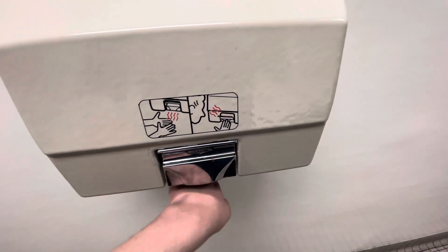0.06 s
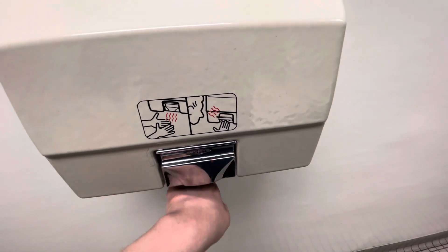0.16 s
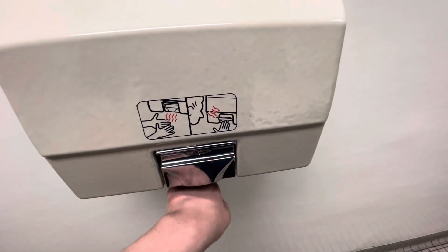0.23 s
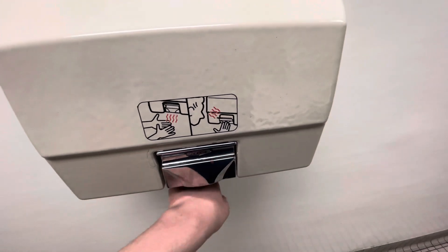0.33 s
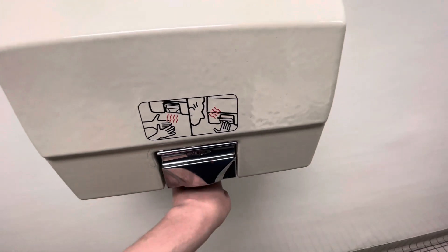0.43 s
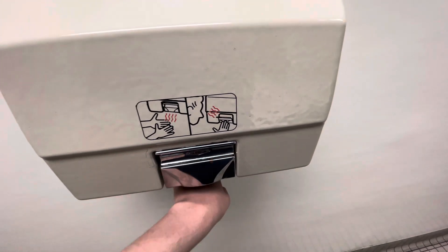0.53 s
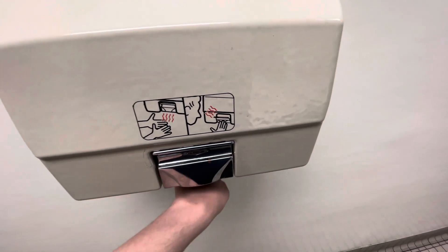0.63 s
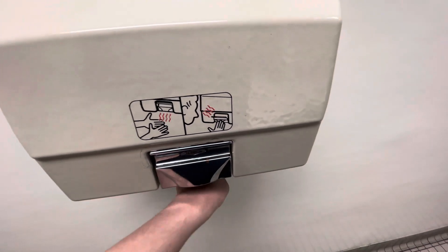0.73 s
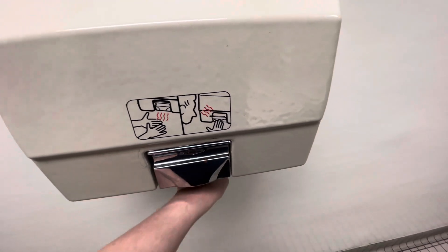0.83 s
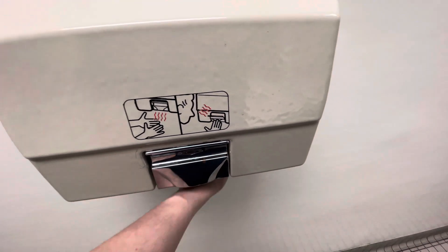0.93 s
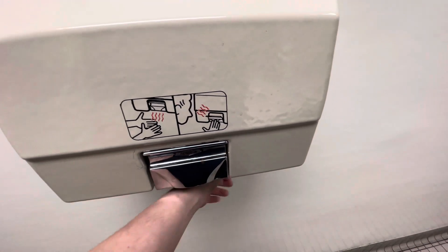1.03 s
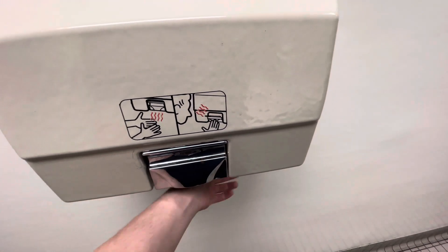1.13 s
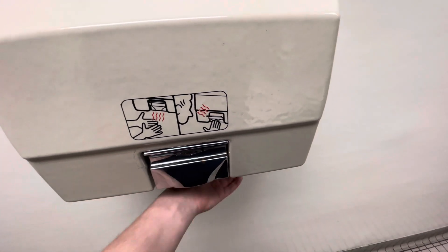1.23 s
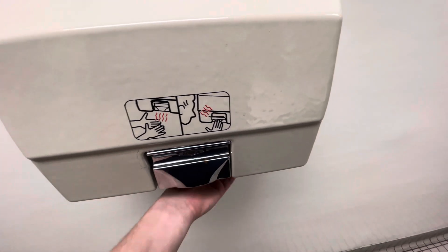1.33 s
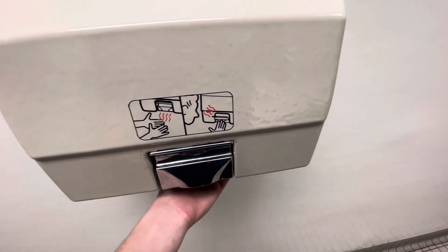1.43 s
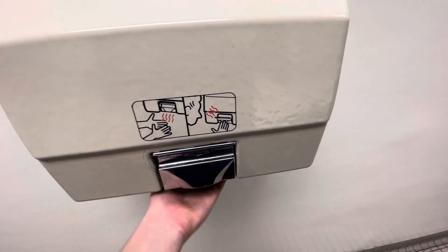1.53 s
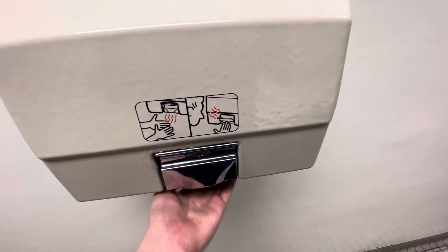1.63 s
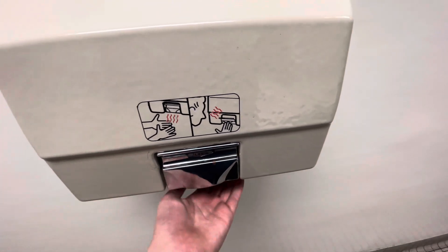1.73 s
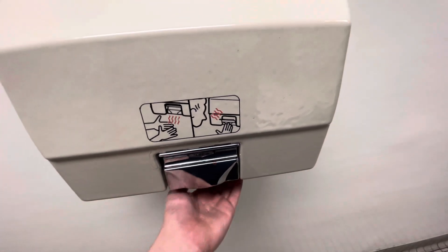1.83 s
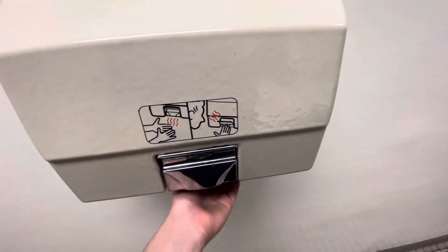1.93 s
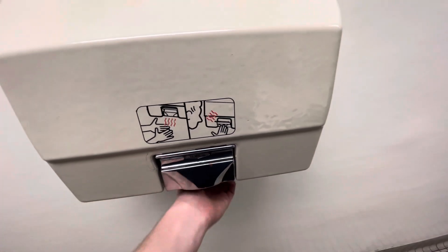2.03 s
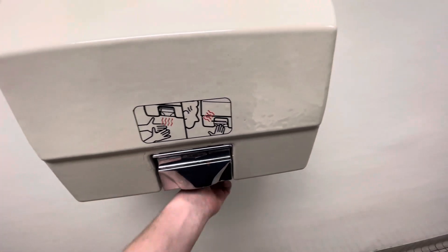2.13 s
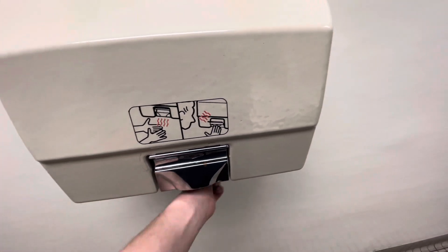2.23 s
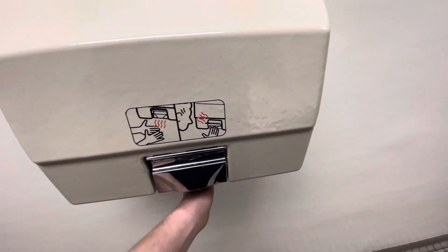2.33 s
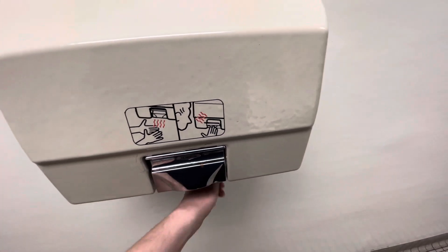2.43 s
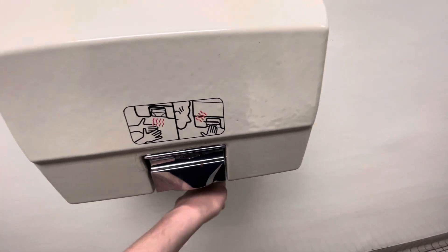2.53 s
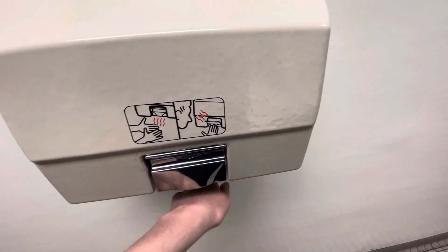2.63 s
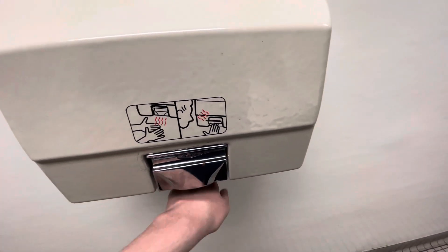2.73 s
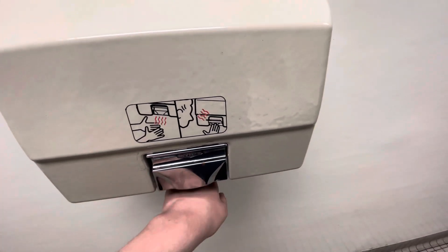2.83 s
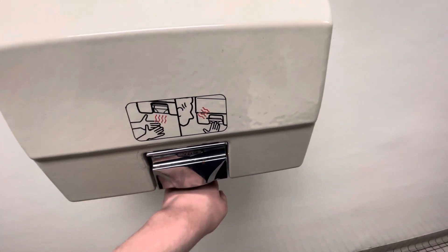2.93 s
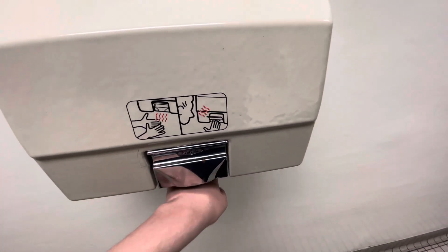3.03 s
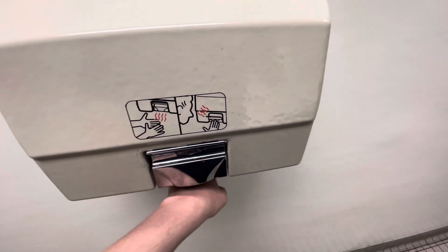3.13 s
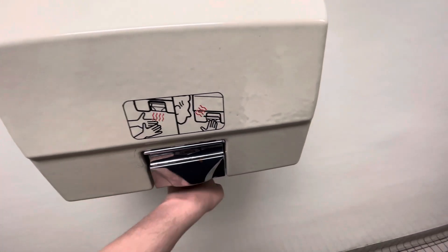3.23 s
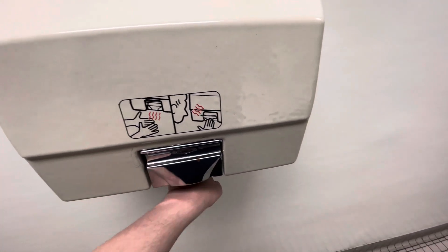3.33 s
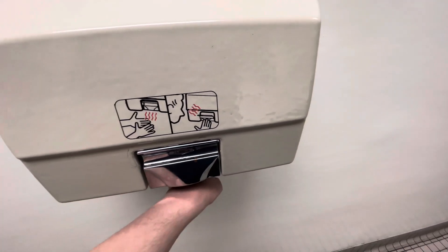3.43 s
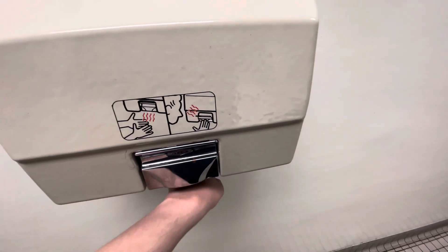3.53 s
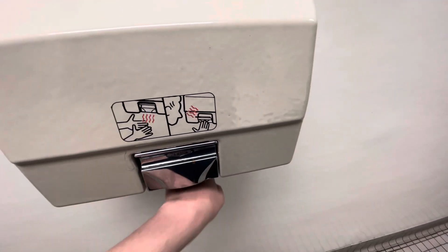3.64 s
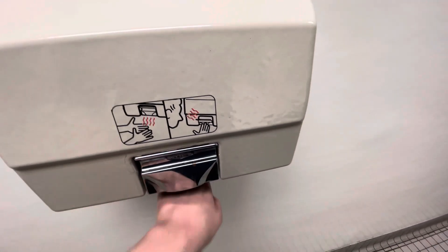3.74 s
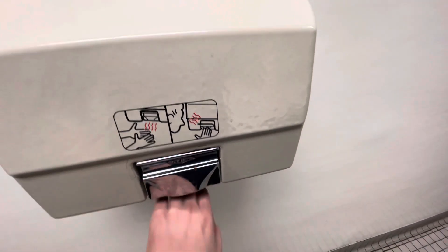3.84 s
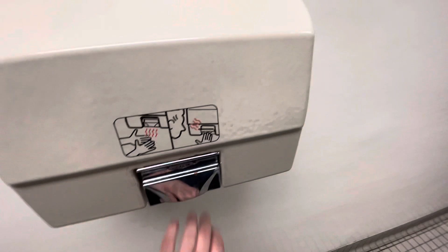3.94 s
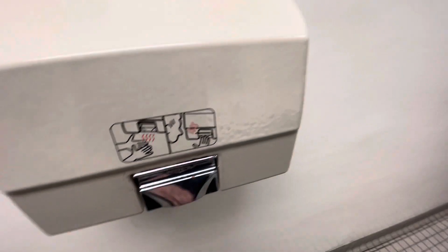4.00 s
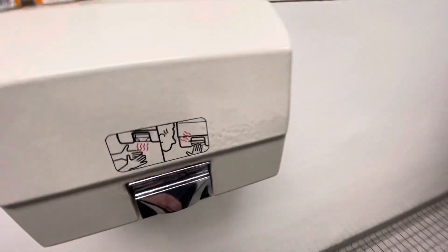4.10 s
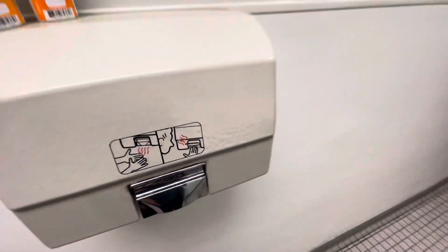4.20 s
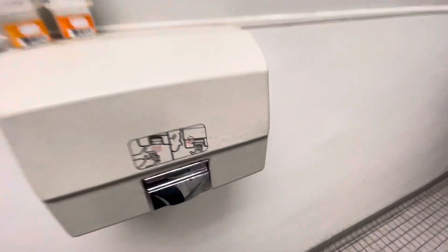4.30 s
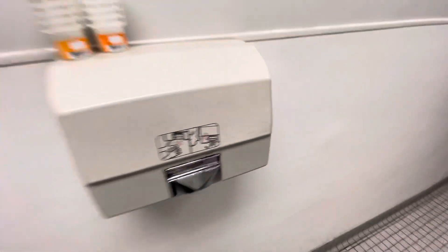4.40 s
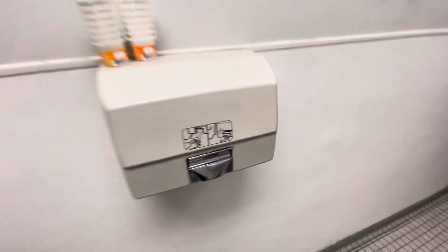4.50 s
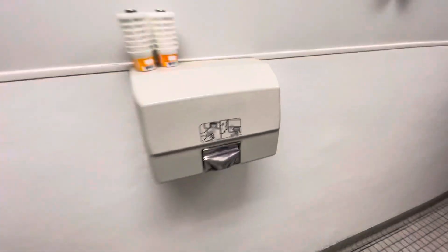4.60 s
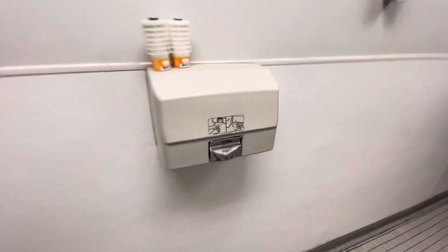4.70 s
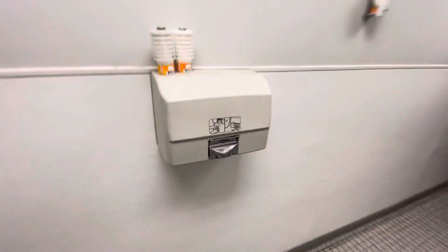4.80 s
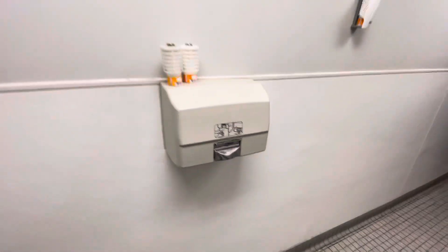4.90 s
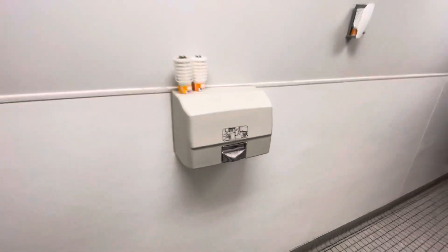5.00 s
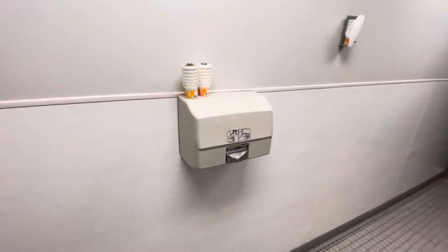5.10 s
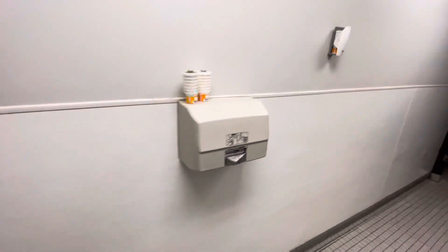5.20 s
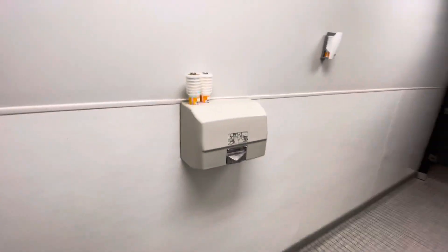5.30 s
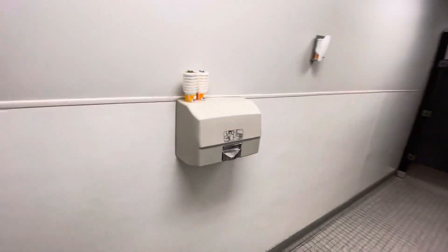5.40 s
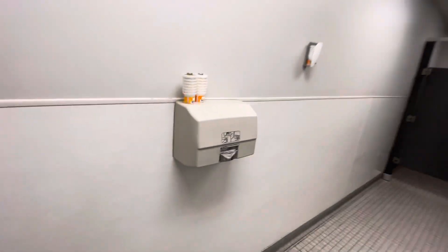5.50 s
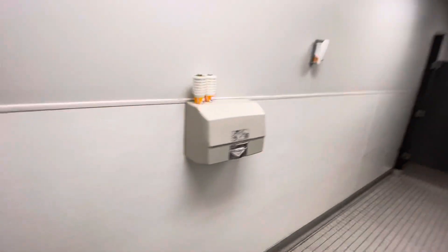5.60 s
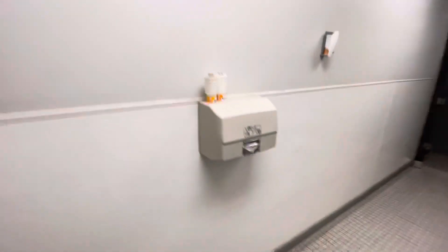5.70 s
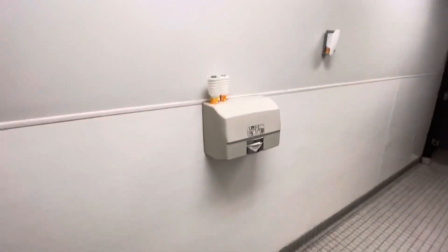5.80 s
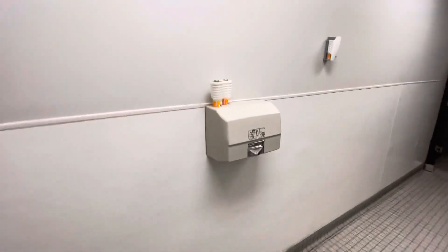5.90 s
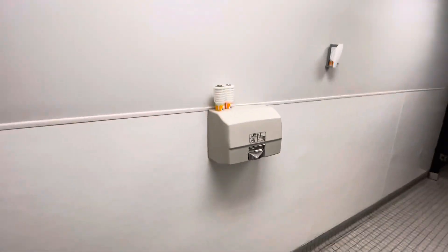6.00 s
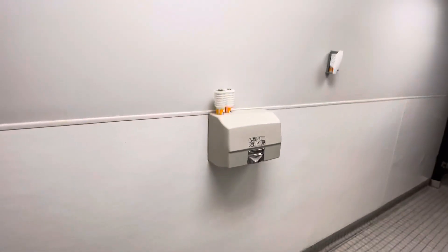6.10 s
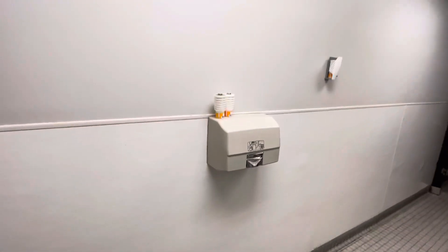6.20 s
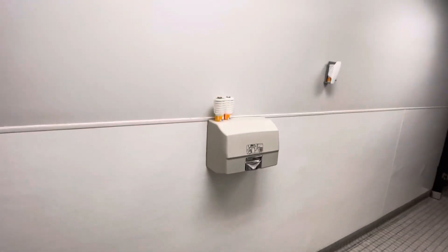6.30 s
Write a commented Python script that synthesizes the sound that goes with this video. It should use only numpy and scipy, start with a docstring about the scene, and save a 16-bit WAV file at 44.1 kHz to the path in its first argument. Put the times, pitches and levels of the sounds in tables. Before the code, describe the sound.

An electric hand dryer runs close to a phone microphone in a tiled restroom: strong low hum, broad fan roar, hissing air fluttering against a moving hand. The hand withdraws, the phone backs off and the sound turns more diffuse and roomy. Finally the motor clicks off with a soft low thump, and the fan winds down over a faint ventilation drone.

```python
"""A wall-mounted warm-air hand dryer in a tiled restroom, over a low ventilation drone, heard by a phone.
First the motor hums, the fan roars through the housing, and the jet hisses and buffets a hand.
Then the hand leaves and the phone backs away, so that room-coloured noise replaces the direct sound.
At last the timer cuts the motor: the hum dies and the coasting fan sinks in level and blade pitch.
Air sounds are filtered noise at two microphone ports; hum and whine are wavering sines."""
import sys
import numpy as np
from scipy import signal
from scipy.fft import rfft, irfft
from scipy.io import wavfile

SR = 44100
rng = np.random.default_rng(int(sys.argv[2]) if len(sys.argv) > 2 else 0)


def to_wav(s):
    """Save 16-bit WAV."""
    ch = np.atleast_2d(s).T  # columns
    pcm = np.round(np.clip(ch, -1, 1) * 32767)  # PCM
    wavfile.write(sys.argv[1], SR, pcm.astype(np.int16))


N = 280024
TIME = np.arange(N) / SR
FREQ = np.maximum(np.fft.rfftfreq(N, 1 / SR), 1)

SHAFT_HZ = 55.1  # turns per second at full speed, before the air load tugs at it
TIMER_S, COAST_HALF_S = 5.594, 1.18  # the timer cuts the power; time from there to half speed
HUM_HANG_S = 0.11  # the hum holds on this long after the timer

# How alike the two microphone ports hear the air close to the nozzle.
# Each row: frequency in Hz, likeness 0-1, phase lead of the left in rad, left minus right in dB.
PORTS_NEAR = [(152, 0.94, 0.34, -1.7), (333, 0.73, .15, 0.5), (503, 0.27, 0.97, 2), (645, 0, -2, 2),
              (810, 0.27, 1, 2), (1010, 0.37, 1.16, 3), (1130, 0.79, 1.1, 1.8), (1400, 0.7, 1.25, 0.5),
              (1620, .5, 1.64, -5), (1800, 0.51, 3, -4.5), (2150, 0.82, 2.5, -6), (2410, .15, 3.5, -5),
              (2770, 0.64, 3, 0), (3030, .89, 3.5, -.5), (3390, .75, 4, 1), (3700, .3, 4.5, .3),
              (4060, 0.6, 0.5, 0), (4770, 0.16, -0.3, 3), (5430, 0.17, 3, 3), (6020, 0.45, 0, 4.5),
              (6550, 0.53, .5, 2), (7230, .55, -1, 1), (8200, .35, 3.5, -3.5), (8740, .08, 1, -7),
              (9340, .45, 4.5, -3), (9800, 0.95, 3.5, -.8), (10450, 1, 3.5, -0.5), (10800, .82, 3.5, 1),
              (11190, 0.7, 1, 0), (11800, .95, 0, 0)]
# The same out in the room.
# Each row: frequency in Hz, likeness 0-1, phase lead of the left in rad, left minus right in dB.
PORTS_FAR = [(207, 0.96, 0.16, 0), (450, 0.15, 1.6, 1), (800, 0.15, 0.5, 0.5), (1310, 0.21, -0.2, 4),
             (2000, 0.1, 1.5, 2.5), (2800, 0.39, -1, 4), (4200, 0.22, 3, 0.5), (6500, 0.19, 1, 7),
             (8660, 0.24, -5, 0), (9800, 1, -3.5, -3), (11700, 0.86, 4.5, 0)]
# Swells and dips of the low eddies and of the rumble while the jet blows on the hand.
# Each row: centre in s, half-length in s, lift of the eddies in dB, lift of the rumble in dB.
JET_SWELLS = [(0.024, 0.12, 1, 0), (0.82, 0.26, 6, 2.1), (1.3, 0.11, 6, -1), (1.77, 0.11, 2, -3),
              (2.18, .2, 2, -1.5), (2.46, 0.12, 7, -1.5), (2.93, 0.43, 0.5, 1.5), (3.252, 0.11, 5, 0),
              (3.6, 0.16, 5, 2), (3.87, 0.033, -8, -6)]
# The cupped palm catches the jet.
# Each row: centre in s, half-length in s, level of the palm ring in dB, lift of the hiss in dB.
CUPS = [(1.72, 0.2, -24, 2), (3.793, 0.09, -34, 1.5)]


def undb(db):
    """Decibels to gain."""
    return 10 ** (np.asarray(db) / 20)


def curve(rows):
    """The columns of a table, joined by straight lines in time."""
    s, *columns = np.transpose(rows)
    return [np.interp(TIME, s, c) for c in columns]


def over_freq(hz, values):
    """Points joined on a log-frequency axis."""
    return np.interp(np.log(FREQ), np.log(hz), values)


def unit(x):
    """Scale a stereo sound so that its middle has rms 1."""
    return x / np.std(x.mean(axis=0))


def pan(db):
    """Left and right gains for a level difference."""
    return undb(np.array([db, -db]).reshape(2, -1) / 2)


def ramp(at_s, over_s):
    """A smooth step from 0 to 1, centred on at_s."""
    return (1 + np.tanh(2 * (TIME - at_s) / over_s)) / 2


def bump(s, length):
    """A smooth rise to 1 and fall, down to 1/e one length away from its centre."""
    return np.exp(-((TIME - s) / length) ** 2)


def band(lo_hz, hi_hz, order=6):
    """Gain of a band with smooth, steep edges."""
    low_edge = 1 + (lo_hz / FREQ) ** (2 * order)
    high_edge = 1 + (FREQ / hi_hz) ** (2 * order)
    return (low_edge * high_edge) ** -.5


def bell(hz, width):
    """Peak shape of one resonance: 1 at its centre, one half at the edges of its width."""
    return 1 / (1 + (2 * (FREQ - hz) / width) ** 2)


def lift(modes):
    """Resonances and dips as a gain in dB over frequency."""
    return sum(db * bell(hz, width) for hz, width, db in modes)


def walk(rate):
    """Slow random wander with spread 1, from a tenth of the rate up to the rate in Hz."""
    steps_per_s = 500
    steps = np.arange(-2, N / SR + 1, 1 / steps_per_s)
    slow = signal.butter(2, [rate / 10, rate], "bandpass", fs=steps_per_s, output="sos")
    wander = signal.sosfilt(slow, rng.standard_normal(len(steps)))
    x = np.interp(TIME, steps, wander)
    return x / x.std()


def tone(phase, flutter_db, flutter_rad, rate, lead=0):
    """A stereo sine of rms about 1 whose strength and phase shake in the moving air; the left leads."""
    shaken = phase + flutter_rad * walk(rate)
    strength = np.sqrt(2) * undb(flutter_db * walk(rate))
    return strength * np.sin([shaken + lead, shaken])


def turbulence(gain, ports):
    """Spectra of coloured noise at the two ports: a shared part, phase-led on the left, and a diffuse part."""
    hz, likeness, lead, side_db = np.transpose(ports)
    likeness = over_freq(hz, np.clip(likeness, 0, .99))
    lead = np.angle(over_freq(hz, np.exp(1j * lead)))
    right, diffuse = rfft(rng.standard_normal((2, N)))
    left = likeness * np.exp(1j * lead) * right + np.sqrt(1 - likeness ** 2) * diffuse
    return gain * np.array([left, right]) * pan(over_freq(hz, side_db))


def ringing(modes, ports):
    """Air noise of rms 1 in a few broad resonances."""
    gain = np.sqrt(sum(undb(db) ** 2 * bell(hz, width) ** 2 for hz, width, db in modes))
    return unit(irfft(turbulence(gain, ports), N))


def passing_rings(rows):
    """Noise in narrow or broad bands that swell, glide and fade, one for each row."""
    steps_per_s = 8000
    steps = np.arange(-1, N / SR + 1, 1 / steps_per_s)
    out = np.zeros((2, N))
    for s, length, hz, glide, width, db in rows:
        # slow complex noise, shifted up to the gliding centre
        narrow = signal.butter(2, width / 2, fs=steps_per_s, output="sos")
        noise = signal.sosfilt(narrow, rng.standard_normal((2, len(steps), 2)) @ np.array([1, 1j]))
        heard = np.abs(TIME - s) < 3 * length
        t = TIME[heard]
        carrier = np.exp(2j * np.pi * (hz + glide * (t - s) / 2) * (t - s))
        slow_noise = np.array([np.interp(t, steps, side) for side in noise])
        ring = np.real(carrier * slow_noise) / noise.real.mean(axis=0).std()
        out[:, heard] += undb(db) * bump(s, length)[heard] * ring
    return out


def wall_echo(x, distance, strength):
    """A bounce off the tiles combs the sound; the comb slides as the phone moves."""
    late = TIME - 2 * distance / 343  # there and back at the speed of sound in m/s
    echo = np.array([np.interp(late, TIME, side) for side in x])
    return (x + strength * echo) / np.hypot(1, strength)


def coasting(lag_s=0):
    """Share of full fan speed: air drag brakes the wheel once the timer runs out."""
    return 1 / (1 + np.maximum(TIME - TIMER_S - lag_s, 0) / COAST_HALF_S)


def air_level(part, in_jet, near):
    """Level in dB of one part of the air stream, from the hand, the phone's place and the fan speed."""
    db, hand_db, far_db, open_db, power = part
    place_db = far_db * (1 - near) + open_db * ramp(5.07, 0.15)  # the sound opens up out in the room
    speed_db = power * 20 * np.log10(coasting(lag_s=0.036))  # air and room follow the wheel late
    return db + hand_db * in_jet + place_db + speed_db


def ventilation():
    """The room's ventilation: noise in one low resonance as a steady drone, with a thin, wavering hum."""
    # The drone: frequency in Hz, width in Hz, level in dB.
    vent_drone = (205, 42, -40)
    # Its hum. Each row: frequency in Hz, level in dB.
    vent_lines = [(250, -45.5), (445, -53.5)]
    hz, width, db = vent_drone
    hum = 0
    for line_hz, line_db in vent_lines:
        line = tone(2 * np.pi * line_hz * TIME, flutter_db=4.0, flutter_rad=1.2, rate=8.0)
        hum = hum + undb(line_db) * line
    return undb(db) * ringing([(hz, width, 0)], PORTS_FAR) + hum


def passing_bands():
    """Short bands of noise: room resonances, a low thump as the motor cuts out, a brief late whistle."""
    # Each row: centre in s, half-length in s, frequency in Hz, glide in Hz per s, width in Hz, level in dB.
    short_bands = [(4.917, 0.13, 191, 1, 41, -27.5), (5.102, .06, 2900, 0, 900, -40),
                   (3.9, .25, 2700, -150, 70, -47), (5.32, 0.16, 2335, 100, 87, -35),
                   (5.66, .14, 2360, -100, 90, -41), (5.08, .17, 1700, 115, 45, -38.5),
                   (5.47, .15, 1728, 100, 43, -33.5), (5.32, 0.09, 5300, 0, 2200, -43),
                   (5.5, 0.1, 1295, 2, 100, -32.5), (5.685, .03, 224, -1, 60, -28),
                   (6.29, 0.045, 2570, 0, 140, -49), (6.33, .03, 1000, 0, 33, -38)]
    return passing_rings(short_bands)


def cabinet_drone(rumble_db, near):
    """The lowest panel modes sing almost steadily under the rumble, close to the cabinet."""
    # Panel modes. Each row: frequency in Hz, level in dB relative to the rumble.
    panels = [(171.5, -5.5), (198, -10.5), (311.5, -13.5)]
    drone = 0
    for hz, db in panels:
        mode = tone(2 * np.pi * hz * TIME, flutter_db=1.1, flutter_rad=0.68, rate=4.7, lead=0.1)
        drone = drone + undb(db) * mode
    return drone * undb(rumble_db) * np.sqrt(near)


def swelling_tones():
    """Single wavering tones that swell and fade at fixed pitches."""
    # Each row: centre in s, frequency in Hz, half-length in s, level in dB.
    swells = [(0.423, 1427, .07, -33), (1.56, 1570, 0.054, -29), (1.634, 1122, 0.16, -28),
              (2.072, 1150, 0.097, -29.5), (3.13, 1120, 0.22, -34), (3.06, 1272, .08, -36),
              (0.92, 1322, 0.11, -31), (2.15, 311, .25, -35), (3.9, 337.2, 0.092, -32),
              (5.444, 447, .05, -35), (5.52, 251.7, 0.12, -28), (5.677, 287, 0.13, -34),
              (6.055, 1168, .06, -41)]
    out = 0
    for s, hz, length, db in swells:
        wavering = tone(2 * np.pi * hz * TIME, flutter_db=1.5, flutter_rad=.4, rate=25)
        out = out + undb(db) * bump(s, length) * wavering
    return out


def fan(angle, roar_db, near):
    """Blade tones, locked to the shaft, ride on the roar and sink in pitch as the wheel coasts."""
    # Blade tones. Each row: multiple of the shaft speed, level in dB relative to the roar.
    blade_tones = [(24, -16), (42, -26), (96, -43), (108, -30)]
    whine = 0
    for k, db in blade_tones:
        whine = whine + undb(db) * tone(k * angle, flutter_db=4.0, flutter_rad=0.7, rate=6.7, lead=0.87)
    return whine * undb(roar_db) * np.sqrt(near)


def duct(roar_db, near):
    """The sharpest duct resonances half whistle, each wavering in pitch and strength on its own."""
    # Duct resonances. Each row: frequency in Hz, level in dB relative to the roar.
    duct_modes = [(1092, -19.5), (1117, -18), (1147, -16), (1262, -21), (1393, -20), (1498, -22),
                  (1566, -22.5)]
    whistles = 0
    for hz, db in duct_modes:
        whistle = tone(2 * np.pi * hz * TIME, flutter_db=3.5, flutter_rad=1.48, rate=6.9, lead=1.0)
        whistles = whistles + undb(db) * whistle
    return whistles * undb(roar_db) * near


def motor(angle, near, distance):
    """The motor shakes the cabinet twice a turn; overtones waver more, the mains adds a faint beat."""
    # Motor tones. Each row: multiple of the shaft speed, level in dB relative to the hum.
    motor_tones = [(2, 0), (4, -11.5), (10, -24.5), (12, -23), (14, -24), (16, -45)]
    (first, first_db), *overtones = motor_tones
    hum = undb(first_db) * tone(first * angle, flutter_db=0.3, flutter_rad=0.11, rate=4.8, lead=0.068)
    for k, db in overtones:
        hum = hum + undb(db) * tone(k * angle, flutter_db=3.5, flutter_rad=0.46, rate=7.7, lead=0.22)
    mains = undb(-25) * np.sqrt(2) * np.sin(2 * np.pi * 120 * TIME)
    # the spinning motor hums on briefly after the timer, then dies
    powered = np.exp(-np.maximum(TIME - TIMER_S - HUM_HANG_S, 0) / .016)
    # the hum holds within 0.77 m of the wall, then fades by 10 dB per m
    hum_db = -21.5 - 10 * np.maximum(distance - 0.77, 0)
    return (hum + mains) * powered * undb(hum_db) * pan(.8 - 2.6 * near)


def jet_rings():
    """The jet rings briefly in narrow resonances, mostly while the hand is in it."""
    # Each row: centre in s, half-length in s, frequency in Hz, glide in Hz per s, width in Hz, level in dB.
    brief_rings = [(0.38, .15, 2120, 0, 160, -37), (0.9, .13, 3360, 0, 150, -46),
                   (1.15, .1, 2120, 4, 90, -43), (1.63, .04, 3975, 0, 110, -42),
                   (1.74, .12, 2154, -500, 300, -36), (2.55, .3, 679, 0, 40, -38),
                   (2.76, .1, 3340, 200, 110, -43), (3.2, .15, 3380, -5, 130, -48),
                   (3.65, .018, 3310, 0, 220, -39), (3.76, 0.073, 1323, 0, 300, -33),
                   (3.79, .05, 3280, -600, 220, -40), (3.8, .09, 4080, 0, 260, -46),
                   (4.15, .018, 3280, 1, 220, -38)]
    return passing_rings(brief_rings)


def hand(in_jet):
    """The jet breaks on the hand into low eddies, rings the gap above it, and rings the cupped palm."""
    # Gap between hand and nozzle. Each row: frequency in Hz, width in Hz, relative level in dB.
    gap_modes = [(2146, 170, 1), (3270, 300, 0), (3960, 260, -7.5)]
    # The gap's ring comes and goes as the hand tilts. Each row: time in s, level in dB before flicker.
    gap_level = [(0, -41), (0.45, -43), (0.9, -40), (1.45, -48), (1.65, -51), (2.2, -41), (2.36, -49),
                 (2.55, -42.5), (3.68, -42), (3.81, -37), (3.93, -40)]
    # Hollow of the palm. Each row: frequency in Hz, width in Hz, relative level in dB.
    palm_modes = [(1180, 400, 5.5), (1520, 370, 6.5), (2160, 330, 1.5), (8700, 1300, -12)]
    eddies = unit(irfft(turbulence(band(55, 137, order=5), PORTS_NEAR), N))
    eddies_db = -39 * in_jet - 48.5 * (1 - in_jet)  # with and without a hand in the jet
    eddies_db = eddies_db + sum(db * bump(s, length) for s, length, db, _ in JET_SWELLS)
    cupped = sum(undb(db) * bump(s, length) for s, length, db, _ in CUPS)
    palm = ringing(palm_modes, PORTS_NEAR) * cupped
    gap = ringing(gap_modes, PORTS_NEAR) * undb(curve(gap_level)[0] + 1.2 * walk(16)) * in_jet
    return eddies * undb(eddies_db + 0.73 * walk(10)) + palm + gap


def air_stream(rumble_db, roar_db, hiss_db, near, distance, in_jet):
    """Turbulence rings the housing close by and the tiled room further off; roar and hiss flicker apart."""
    # Air noise at the nozzle. Each row: frequency in Hz, relative level in dB.
    nozzle_colour = [(140, -5.5), (200, -0.5), (280, -10.5), (550, -11.5), (730, -12), (880, -13),
                     (1150, -9.5), (1580, -11), (1720, -18), (2200, -21), (2450, -23.5), (2800, -22.5),
                     (3150, -21.5), (3650, -27.5), (4400, -28), (5000, -26), (6800, -26.5), (7450, -29),
                     (8300, -27), (9000, -28), (10600, -22.5), (11400, -28.5), (12300, -38.5)]
    # Air noise out in the room. Each row: frequency in Hz, relative level in dB.
    room_colour = [(140, -8), (240, -2), (350, -4), (600, -6), (900, -4), (1250, -4.5), (1600, -6),
                   (2000, -14), (2450, -15), (3200, -20), (4300, -20.5), (5400, -19), (7100, -14.5),
                   (8500, -20), (10500, -25), (12000, -34)]
    # Resonances and dips of housing and duct. Each row: frequency in Hz, width in Hz, lift in dB.
    housing_modes = [(173.4, 6.9, 2), (196, 22, 4.5), (260, 30, 3), (303.5, 6.1, 5.5), (338, 7.4, 8),
                     (374, 12, -3.5), (408.6, 8.7, 6.5), (446, 12, 2), (490, 12.2, 0.5), (677, 23, 3),
                     (718, 27, -4.5), (905, 24, -3.5), (951, 28, 5), (1085, 16.5, 7), (1129, 31, 6),
                     (1190, 30, -3), (1280, 39, 4), (1328, 16, 6.5), (1344, 22, -3), (1391, 11, 6.5),
                     (1428, 12, 6.5), (1468, 16, 5.5), (1467, 12, 2.5), (1546, 26, -4), (1568, 12, 5),
                     (1621, 22, 6.5), (1947, 38, 6.5), (2110, 52, 3.5), (2670, 70, 2), (4120, 90, 3),
                     (6710, 59, 7)]
    # Modes of the tiled room. Each row: frequency in Hz, width in Hz, lift in dB.
    room_modes = [(181, 11, 9), (198.5, 28, 7.5), (244, 20, 4.5), (277, 8, 4), (1290, 61, 3),
                  (1690, 110, 3.5), (2310, 89, 3.5)]
    # Colour once the jet blows free of the hand. Each row: frequency in Hz, width in Hz, lift in dB.
    free_colour = [(1510, 280, -5), (1010, 220, 3), (2830, 120, 0), (3450, 400, 2), (4970, 240, 4)]
    # The phone turns away. Each row: time in s, added left minus right of the hiss in dB.
    turning = [(0, 0), (5.3, 0), (5.8, 2), (6.1, 2.5), (6.35, 6)]
    nozzle_gain = undb(over_freq(*np.transpose(nozzle_colour)) + lift(housing_modes))
    direct = turbulence(nozzle_gain, PORTS_NEAR)
    free = direct * undb(lift(free_colour))
    room_gain = undb(over_freq(*np.transpose(room_colour)) + lift(room_modes))
    room = turbulence(room_gain, PORTS_FAR)

    def part(gain):
        """One band of the stream, blended from hand to free jet and from close to far."""
        on_hand = unit(irfft(direct * gain, N))
        off_hand = unit(irfft(free * gain, N))
        close = in_jet * on_hand + (1 - in_jet) * off_hand
        far = wall_echo(unit(irfft(room * gain, N)), distance, strength=0.36)
        return np.sqrt(near) * close + np.sqrt(1 - near) * far

    rumble = part(band(117, 304)) * undb(rumble_db)
    roar = part(band(339, 3050)) * undb(roar_db + 0.68 * walk(8.8))
    hiss = part(band(2650, 12100)) * undb(hiss_db + .3 * walk(21)) * pan(curve(turning)[0])
    return rumble + roar + hiss


def scene():
    """One shaft drives hum and blade tones; moving air makes most of the rest, over the ventilation."""
    # The phone backs away. Each row: time in s, share of direct sound 0-1, distance from the wall in m.
    nearness = [(0, 0.97, 0.46), (3.85, 0.96, 0.36), (4.5, 0.66, 0.83), (5.1, 0.25, 1.5), (6.35, 0, 1.82)]
    # Three parts of the air stream, each holding: level in dB, lift with a hand in the jet in dB,
    # change far from the dryer in dB, lift as the sound opens in dB, power of the fan speed.
    rumble_part = (-28.5, 3.5, -1.5, -1.5, 3)
    roar_part = (-26.5, 2, 0.5, 0.8, 4)
    hiss_part = (-36, 1.3, -2, 4, 4)
    speed = SHAFT_HZ * coasting() * (1 + 0.0014 * walk(2.94))  # the air load tugs at the wheel
    angle = 2 * np.pi * np.cumsum(speed) / SR
    near, distance = curve(nearness)
    near = np.clip(near, 0, 1)
    in_jet = 1 - ramp(3.98, 0.23)  # the hand leaves

    swells_db = sum(db * bump(s, length) for s, length, _, db in JET_SWELLS)
    unpowered_db = -1.5 * ramp(TIMER_S + HUM_HANG_S, 0.04)  # the cabinet rumbles less once the hum dies
    rumble_db = air_level(rumble_part, in_jet, near) + swells_db + unpowered_db
    roar_db = air_level(roar_part, in_jet, near)
    cups_db = sum(db * bump(s, length) for s, length, _, db in CUPS)
    hiss_db = air_level(hiss_part, in_jet, near) + cups_db

    background = ventilation() + passing_bands() + swelling_tones()
    machine = cabinet_drone(rumble_db, near) + fan(angle, roar_db, near) + motor(angle, near, distance)
    air = duct(roar_db, near) + jet_rings() + hand(in_jet)
    air = air + air_stream(rumble_db, roar_db, hiss_db, near, distance, in_jet)
    return background + machine + air


def record(dry):
    """The phone cuts the top with a steep low-pass at 12.4 kHz."""
    return signal.sosfilt(signal.ellip(10, .2, 80, 12400, fs=SR, output="sos"), dry)


dry = scene()
out = record(dry)
to_wav(out)
```